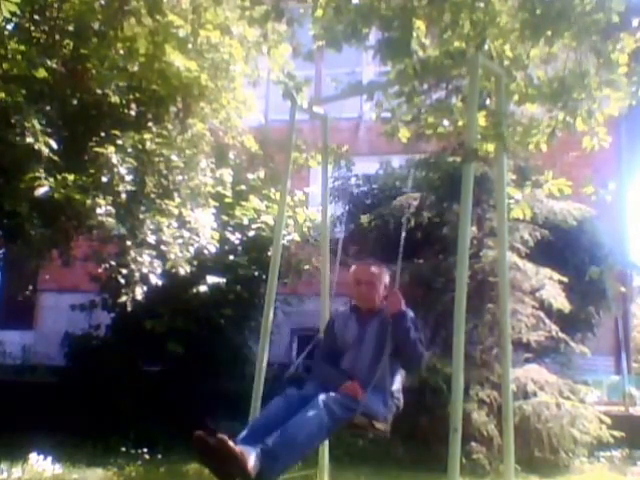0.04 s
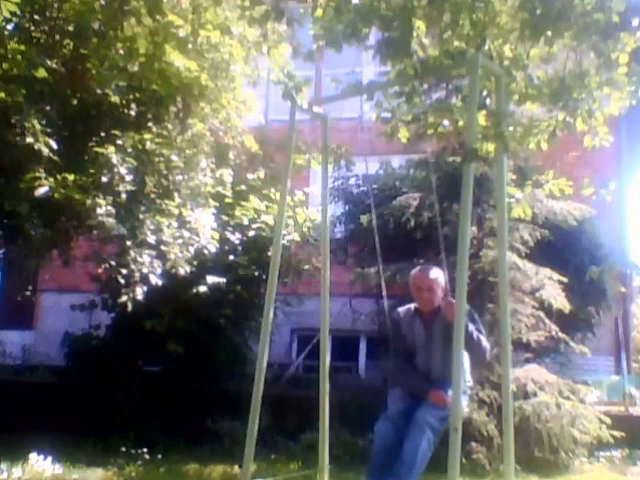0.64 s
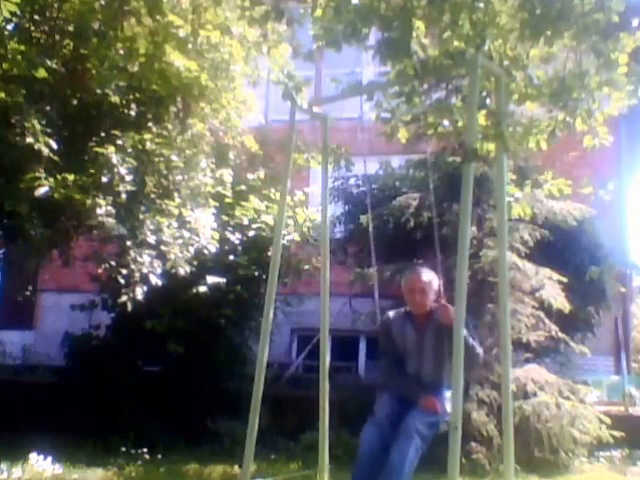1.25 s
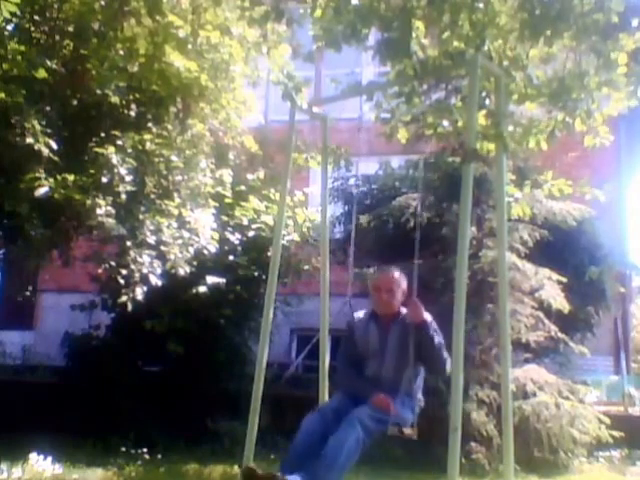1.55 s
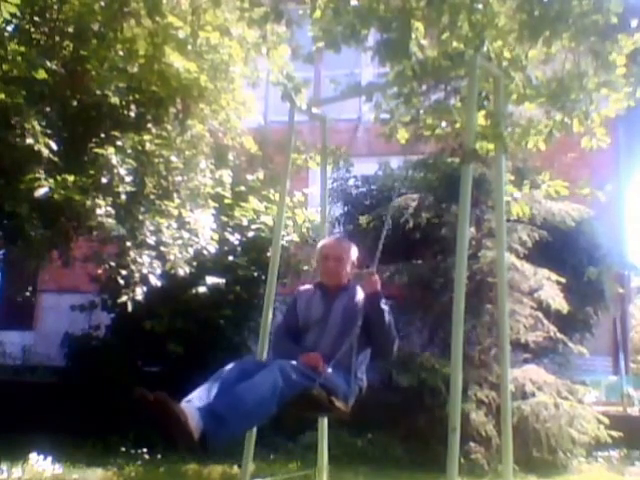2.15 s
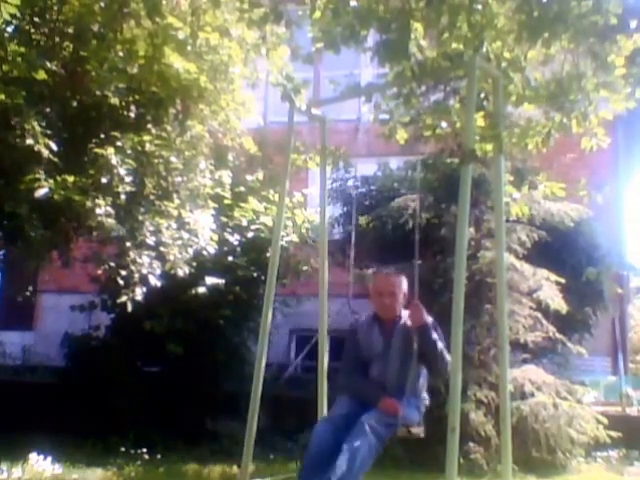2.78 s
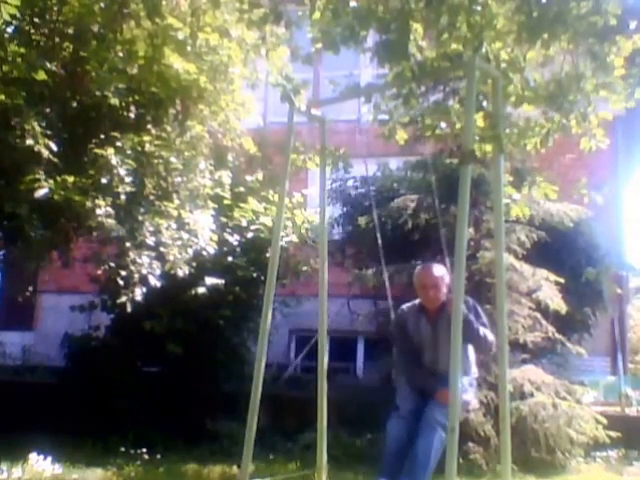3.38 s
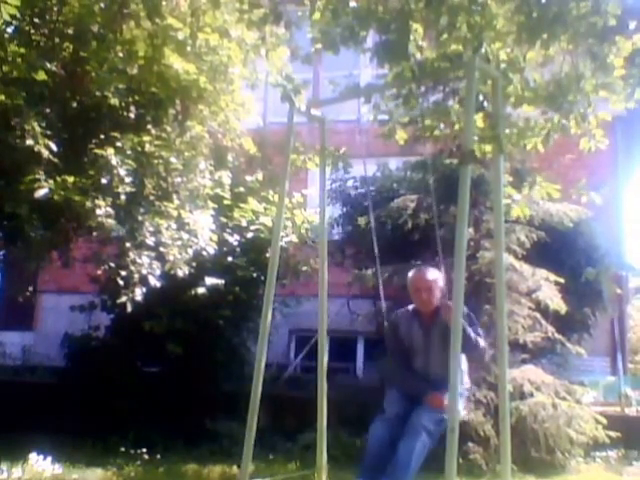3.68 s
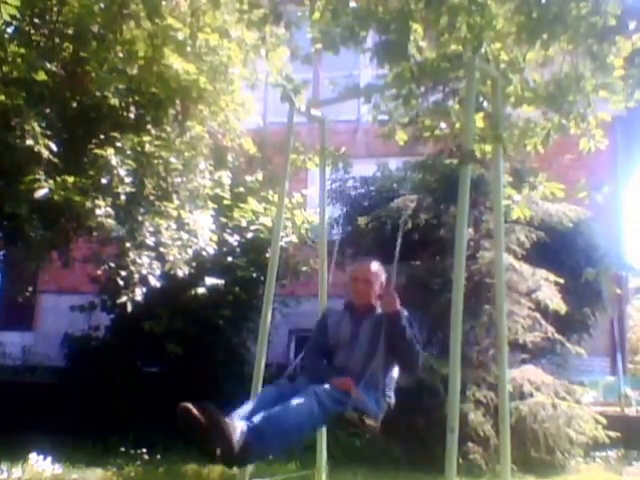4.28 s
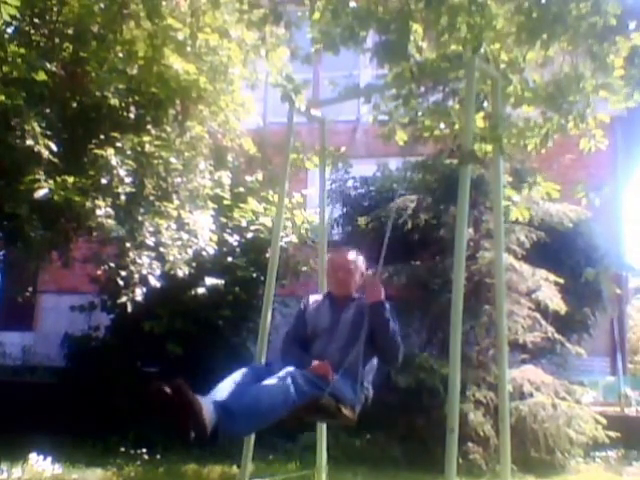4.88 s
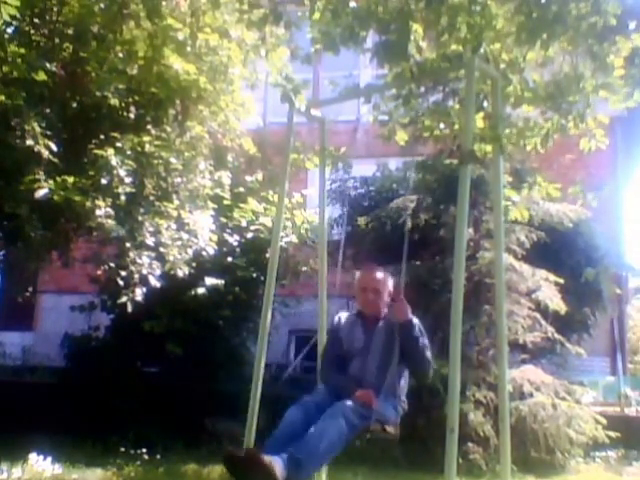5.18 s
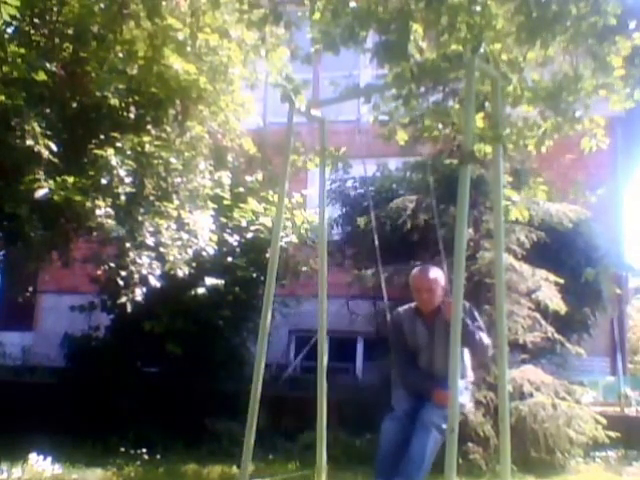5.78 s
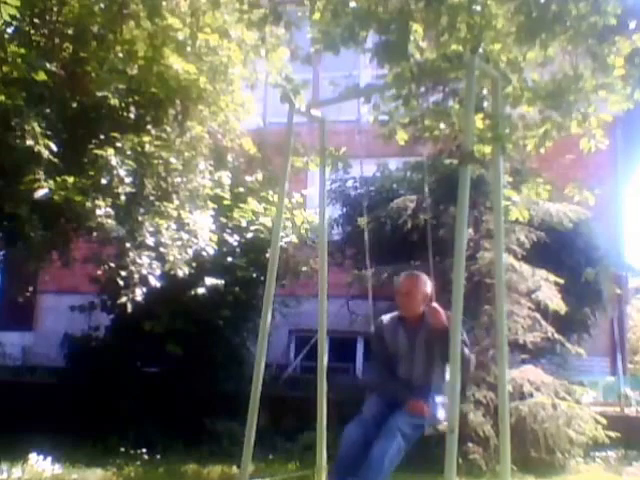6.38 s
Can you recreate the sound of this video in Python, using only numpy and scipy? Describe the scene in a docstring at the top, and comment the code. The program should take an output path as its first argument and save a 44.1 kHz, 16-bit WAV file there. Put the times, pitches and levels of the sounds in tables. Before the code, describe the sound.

A steel swing moves back and forth in a garden, its tube frame giving a ringing clank about every two and a half seconds, three times in all. A short brush and wind puffs touch the microphone before the first clank. The hangers tick lightly between the last two, while gusts rumble softly. A distant bird, outdoor hush and a faint hum lie behind. The microphone sounds small and dull.

```python
"""A ringing steel clank on every backswing of a garden swing: a hanger shifts on the top bar and knocks the
tube frame. The hangers clink within each knock, and a few times lightly in between; house wall and garden echo
each knock. Wind puffs on a small, dull microphone, with one short brush close by. Behind it lie a far bird,
outdoor hush and a faint hum."""
import sys
import numpy as np
from scipy import signal
from scipy.fft import rfft, irfft, next_fast_len
from scipy.io import wavfile
from scipy.ndimage import uniform_filter1d, map_coordinates

SR = 44100
rng = np.random.default_rng(int(sys.argv[2]) if len(sys.argv) > 2 else 0)


def wav_out(sig):
    """Save sig, one row per channel (or a flat mono array), as 16-bit PCM at SR to the path in sys.argv[1]."""
    wavfile.write(sys.argv[1], SR, np.round(np.clip(np.atleast_2d(sig).T, -1, 1) * 32767).astype(np.int16))


N = 288089
T = np.arange(N) / SR


# Tube modes: (frequency [Hz], relative level [dB], nominal t60 [s], gain per unit of position [dB])
FRAME_MODES = [(271, -29, .5, 3), (335, -37, .35, 3), (372, -39, .42, -2), (488, -36, .4, 1),
               (733, -31, .32, -1), (877, -37, .3, 0), (928, -35, .42, 4), (953, -32, .48, -2),
               (1064, -35, .38, 3), (1226, -42, .38, 3), (1409, -25, .25, -1), (1436, -28, .2, 3),
               (1469, -35, .45, 0), (1624, -33, .25, -2), (1676, -31, .22, -1), (1726, -28, .19, 0),
               (1840, -32, .22, 1), (1872, -31, .24, 4), (1988, -31, .26, -1), (2004, -25, .19, -4),
               (2418, -37, .18, 4), (2465, -33, .22, 1), (2755, -38, .19, 0), (2973, -44, .26, -4),
               (3295, -45, .27, 2), (3628, -50, .17, 3)]

def tube_ring(t, position, decay_scale):
    """A tube bends in two planes: each mode beats with a weak, detuned twin that lingers."""
    hz, mode_db, t60_s, slope_db = np.transpose(FRAME_MODES)[:, :, None]
    gain = amp(mode_db + position * slope_db)  # the contact point favours some modes
    phase, twin_phase = rng.uniform(0, 2 * np.pi, (2, len(hz), 1))
    modes = fade(t, t60_s * decay_scale * 1.03) * np.sin(2 * np.pi * hz * t + phase)
    twin_hz = hz + rng.normal(0, 6, hz.shape)
    twins = amp(-16) * fade(t, t60_s * decay_scale * 1.85) * np.sin(2 * np.pi * twin_hz * t + twin_phase)
    return np.sum(gain * (modes + twins), axis=0)


# Dense, quickly damped frame modes: (frequency [Hz], relative density [dB])
CLATTER_SPECTRUM = [(130, -33.5), (190, -4), (300, 5), (400, -1.5), (530, -2.5), (660, -12.5), (900, -1.5),
                    (1200, -9), (1450, -4), (1950, -2.5), (2250, -15.5), (2950, -9.5), (3900, -25.5),
                    (5300, -40)]
# Their decay: (frequency [Hz], t60 [s])
CLATTER_DECAY = [(150, 0.25), (300, 0.34), (1000, 0.4), (2000, 0.28), (4500, 0.38)]
# Knocks: (time [s], gain [dB], position on bar [-1..1], clatter trim [dB], ring decay [x], echo [dB])
BAR_KNOCKS = [(0.7337, -0.5, -0.59, 2.5, 0.89, -28.5), (3.2660, 1.5, -0.47, 1, 0.94, -38),
              (6.0870, 1.5, 1, 1, 0.79, -11)]

def frame_knocks():
    """Each knock spreads through the tubes: clear modes over dense clatter and a thud of the posts."""
    out, t = np.zeros(N), T[:SR]
    for start_s, db, position, clatter_db, decay_scale, echo_db in BAR_KNOCKS:
        ring = tube_ring(t, position, decay_scale)
        dense_modes = steady(noise(CLATTER_SPECTRUM, size=SR), span_s=0.007)
        clatter = amp(clatter_db - 25.5) * damped(dense_modes, CLATTER_DECAY)
        posts = steady(band_noise(hz=166, octaves=0.97, size=SR), span_s=0.017)
        thud = amp(-36) * posts * fade(t, t60_s=0.35)
        attack = 1 - np.exp(-(t / 0.0034) ** 2)  # the load takes a moment to come onto the bar
        add(out, start_s, garden_echo(amp(db) * attack * (ring + clatter + thud), echo_db))
    return out


# Hanger contacts: (time [s], level [dB], centre [Hz], width [octaves], t60 [s])
HANGER_CONTACTS = [(0.732, -21.5, 1825, 0.16, 0.15), (.7480, -17.5, 1390, 0.65, 0.046),
                   (3.2653, -17.5, 1900, .15, 0.025), (3.2723, -22.5, 1910, 0.12, 0.015),
                   (3.2766, -17, 1350, 0.21, 0.015), (4.7409, -52.5, 1880, 0.92, 0.13),
                   (4.7616, -49.5, 1520, 0.55, 0.19), (5.2706, -38, 3550, 0.23, 0.028),
                   (5.2727, -48.5, 2090, 0.65, 0.55), (5.888, -44, 2930, 0.08, 0.023),
                   (6.088, -25, 1790, 0.73, 0.022), (6.0945, -11.5, 1340, 0.38, 0.023),
                   (6.1948, -36.5, 2090, 0.31, .07), (6.2090, -47, 2420, 0.54, 0.83)]

def hanger_ticks():
    """Steel meets steel: each contact is a short clink in one band."""
    out, t = np.zeros(N), T[:SR // 2]
    attack = 1 - np.exp(-t / 0.0012)
    for start_s, db, hz, octaves, t60_s in HANGER_CONTACTS:
        clink = steady(band_noise(hz, octaves, size=len(t)), span_s=0.0067) * fade(t, t60_s)
        add(out, start_s, garden_echo(amp(db) * attack * clink, echo_db=-12))
    return out


# Echo decay: (frequency [Hz], t60 [s])
GARDEN_DECAY = [(150, 0.61), (1000, 0.78), (2500, 0.51), (5000, 0.76)]

def garden_echo(x, echo_db):
    """x plus diffuse reflections from wall and trees, building up over milliseconds."""
    build_up = 1 - np.exp(-T[:SR] / 0.0084)
    tail = damped(rng.standard_normal(SR), GARDEN_DECAY) * build_up
    return x + amp(echo_db) * signal.fftconvolve(x, tail / np.linalg.norm(tail))[:len(x)]


# Wind rumble: (frequency [Hz], relative density [dB])
RUMBLE_SPECTRUM = [(15, -28), (28, -11), (37, -6), (43.5, 1), (51, -9), (70, -13), (100, -18), (150, -30)]
# Wind flutter: (frequency [Hz], relative density [dB])
FLUTTER_SPECTRUM = [(60, -11), (100, 5.5), (135, -1.5), (160, -4.5), (195, 2), (245, -7), (320, -11.5),
                    (450, -18), (800, -42)]
# Gusts: (peak time [s], half length [s], rumble [dB], flutter re rumble [dB])
WIND_GUSTS = [(0.147, 0.024, -41, -7.5), (0.452, 0.07, -41, 5), (0.68, 0.07, -38, 1),
              (2.702, .03, -47, 1.5), (3.265, 0.045, -41.5, -10), (4.338, 0.042, -32, -13),
              (4.684, 0.074, -31, -13), (4.96, 0.1, -30.5, -15), (5.591, 0.042, -37, -15),
              (5.826, 0.071, -41.5, -9), (6.323, .025, -31.5, -16), (6.514, 0.11, -33, -12.5)]

def wind(draught_db=-48, wander_db=2.5, draught_flutter_db=-5.5, gust_cutoff_hz=78):
    """Eddies at the microphone: a wavering draught and passing gusts drive rumble and flutter."""
    draught = amp(draught_db + wander_db * wobble(8.7))
    gust_power = np.zeros(N)
    flutter_power = (draught * amp(draught_flutter_db)) ** 2
    for peak_s, half_s, db, flutter_db in WIND_GUSTS:
        gust = amp(db) ** 2 * np.exp(-((T - peak_s) / half_s) ** 2)
        gust_power += gust
        flutter_power += gust * amp(flutter_db) ** 2
    big_eddies = lowpass(noise(RUMBLE_SPECTRUM), gust_cutoff_hz)
    rumble = draught * noise(RUMBLE_SPECTRUM) + np.sqrt(gust_power) * steady(big_eddies, span_s=0.032)
    flutter = np.sqrt(flutter_power) * steady(noise(FLUTTER_SPECTRUM), span_s=0.078)
    return rumble + flutter


# Puffs: (time [s], peak level [dB], centre [Hz])
WIND_PUFFS = [(0.3495, -21.5, 147), (0.3738, -26, 152), (0.456, -25, 106), (1.075, -34, 94),
              (1.475, -35.5, 65), (2.693, -34, 60), (4.10, -34, 55), (5.46, -33, 49)]

def puffs():
    """Each sudden puff pulls and pushes on the microphone once."""
    out = np.zeros(N)
    for centre_s, db, hz in WIND_PUFFS:
        phase = 2 * np.pi * hz * (T - centre_s)
        out += amp(db) * phase * np.exp((1 - phase ** 2) / 2)
    return out


# Low burr: (frequency [Hz], relative density [dB])
BURR_SPECTRUM = [(100, -8), (134, 3), (162, -18), (205, 0), (250, -4), (330, -13), (430, -32)]
# Brush noise: (frequency [Hz], relative density [dB])
BRUSH_SPECTRUM = [(120, -8.5), (250, -0.5), (450, 1.5), (680, -3.5), (1000, 2), (1300, -6), (1950, -5.5),
                  (2400, -21.5), (3100, -21), (5000, -52.5)]
# Overlapping strokes: (time [s], level [dB], rise [s], t60 [s])
BRUSH_STROKES = [(0.345, -42.5, .025, 0.37), (0.388, -36.5, .008, 0.31), (0.46, -53, 0.15, .55)]

def brush():
    """A dull low burr rings briefly, and a short brush close to the microphone gives grainy noise."""
    burr_envelope = amp(-22.5) * stroke(start_s=0.34, rise_s=0.039, t60_s=0.21)
    burr = burr_envelope * steady(noise(BURR_SPECTRUM), span_s=0.016)
    pressure = sum(amp(db) * stroke(s, rise_s, t60_s) for s, db, rise_s, t60_s in BRUSH_STROKES)
    grain = amp(1.7 * wobble(200))
    return burr + pressure * grain * noise(BRUSH_SPECTRUM)


# Notes: (time [s], length [s], start pitch [Hz], end pitch [Hz], level [dB])
BIRD_NOTES = [(1.469, 0.37, 2536, 2693, -58.5), (1.7, .28, 2696, 2553, -57.5),
              (1.801, 0.056, 2064, 1810, -51), (1.897, 0.25, 2675, 2460, -60.5),
              (3.97, 0.21, 2650, 2550, -60.5), (4.158, 0.28, 2170, 1987, -59.5),
              (4.419, 0.27, 2745, 2320, -58)]

def bird():
    """Distant whistled glides, blurred by the trees."""
    out = np.zeros(N)
    for start_s, length_s, start_hz, end_hz, db in BIRD_NOTES:
        progress = np.linspace(0, 1, int(length_s * SR))
        phase = 2 * np.pi * np.cumsum(start_hz + (end_hz - start_hz) * progress) / SR
        blur = unit(lowpass(rng.standard_normal(len(progress)), cutoff_hz=160))
        add(out, start_s, amp(db) * np.sin(np.pi * progress) * blur * np.sin(phase))
    return garden_echo(out, echo_db=-12)


# Outdoor hush: (frequency [Hz], relative density [dB])
HUSH_SPECTRUM = [(88, -25.5), (150, -3), (269, -12.5), (303, -4.5), (331, -13), (418, -13), (457, -11),
                 (477, -12), (577, -14), (820, -11.5), (1500, -17), (2190, -20), (2570, -20), (4970, -45),
                 (6460, -83.5), (10900, -120)]
# Swells: (peak time [s], Gaussian sigma [s], centre [Hz], level [dB])
HUSH_SWELLS = [(1.605, 0.054, 910, -51.5), (1.675, 0.055, 344, -49), (2.187, 0.039, 1130, -57.5),
               (2.68, .04, 750, -58), (2.918, 0.021, 484, -54), (2.99, 0.05, 1390, -65),
               (3.5, .045, 1340, -56.5), (5.186, 0.023, 1730, -56), (5.213, 0.055, 810, -57.5),
               (5.362, 0.029, 1190, -55.5)]

def hush():
    """Outdoor noise, drifting slightly in level, with a few soft swells."""
    drift_db = 0.4 * wobble(2) + 0.4 * wobble(12)
    out = amp(-53.5 + drift_db) * noise(HUSH_SPECTRUM)
    for peak_s, sigma_s, hz, db in HUSH_SWELLS:
        swell = np.exp(-((T - peak_s) / sigma_s) ** 2 / 2)
        out += amp(db) * swell * band_noise(hz, octaves=0.68, size=N)
    return out


# Hum partials: (frequency [Hz], relative level [dB])
HUM_PARTIALS = [(489.5, -65.5), (732, -71.5), (1222, -73), (1340, -72.5), (1464, -71)]

def hum(gain_db=3.5, waver_rad=0.51):
    """Thin tones, each wavering in phase."""
    return sum(amp(db + gain_db) * np.sin(2 * np.pi * hz * T + waver_rad * wobble(8))
               for hz, db in HUM_PARTIALS)


def amp(db):
    """Decibels to gain."""
    return 10 ** (np.asarray(db) / 20)


def unit(x):
    """Scale to rms 1."""
    return x / np.sqrt(np.mean(x ** 2) + 1e-20)


def along(points, hz):
    """Interpolate (frequency [Hz], value) points on a log axis."""
    point_hz, values = np.transpose(points)
    return np.interp(np.log(hz + 1), np.log(point_hz + 1), values)


def wobble(rate_hz):
    """Smooth random curve with knots at rate_hz."""
    return map_coordinates(rng.standard_normal(int(N * rate_hz / SR) + 4), [T * rate_hz])


def filtered(x, response):
    """Apply a zero-phase frequency response."""
    size = next_fast_len(len(x) + SR // 4)
    return irfft(rfft(x, size) * response(np.fft.rfftfreq(size, 1 / SR)), size)[:len(x)]


def lowpass(x, cutoff_hz):
    """Roll off at 24 dB per octave."""
    return filtered(x, lambda hz: 1 / (1 + (hz / cutoff_hz) ** 4))


def noise(spectrum, size=N):
    """Coloured noise of rms 1, falling away above the last point."""
    skirt = lambda hz: np.maximum(hz / spectrum[-1][0], 1) ** -4
    return unit(filtered(rng.standard_normal(size), lambda hz: amp(along(spectrum, hz)) * skirt(hz)))


def band_noise(hz, octaves, size):
    """Noise of rms 1 in one band around hz."""
    band = lambda f: 1 / (1 + (np.log2((f + 1) / hz) / octaves) ** 2) ** 2
    return unit(filtered(rng.standard_normal(size), band))


def steady(x, span_s):
    """Hold the running rms near 1."""
    width = max(int(span_s * SR), 2)
    power = uniform_filter1d(uniform_filter1d(x * x, width), width)
    return x / np.sqrt(np.abs(power) + 1e-9)


def damped(x, decay):
    """Decay each frequency at its own t60."""
    hz, t, bins = signal.stft(x, SR, nperseg=256)
    gain = amp(-60 * t / along(decay, hz)[:, None])
    return signal.istft(bins * gain, SR, nperseg=256)[1][:len(x)]


def fade(t, t60_s):
    """Exponential decay."""
    return np.exp(-np.log(1000) * t / t60_s)


def stroke(start_s, rise_s, t60_s):
    """Linear rise to 1, then exponential decay."""
    return np.clip((T - start_s) / rise_s, 0, 1) * fade(np.maximum(T - start_s - rise_s, 0), t60_s)


def add(track, start_s, x):
    """Mix x into the track in place."""
    part = track[max(round(start_s * SR), 0):][:len(x)]
    part += x[:len(part)]


def scene():
    """Swing, wind and garden at one microphone."""
    return (frame_knocks() + hanger_ticks() + wind() + puffs() + brush() + bird() + hush() + hum())[None]


# Leak into the mirror images: (frequency before mirroring [Hz], relative gain [dB])
IMAGE_RESPONSE = [(50, -8), (200, -3.5), (1000, -0.5), (2000, 1.5)]

def record(dry):
    """The recorder keeps a narrow band; its low sampling rate leaves faint mirror images in the treble."""
    cutoff_hz, stopband_db, sampling_hz, top_hz = 5150, -20, 8000, 15700
    passband = lambda hz: np.maximum(1 / np.sqrt(1 + (hz / cutoff_hz) ** 90), amp(stopband_db))
    narrow = filtered(dry[0], passband)
    leak = filtered(narrow, lambda hz: amp(along(IMAGE_RESPONSE, hz)))
    clock_phase = 2 * np.pi * sampling_hz * T
    images = leak * (amp(-51.5) * np.cos(clock_phase) + amp(-61) * np.cos(2 * clock_phase))
    return filtered(narrow + images, lambda hz: hz < top_hz)[None]


dry = scene()
out = record(dry)
wav_out(out)
```